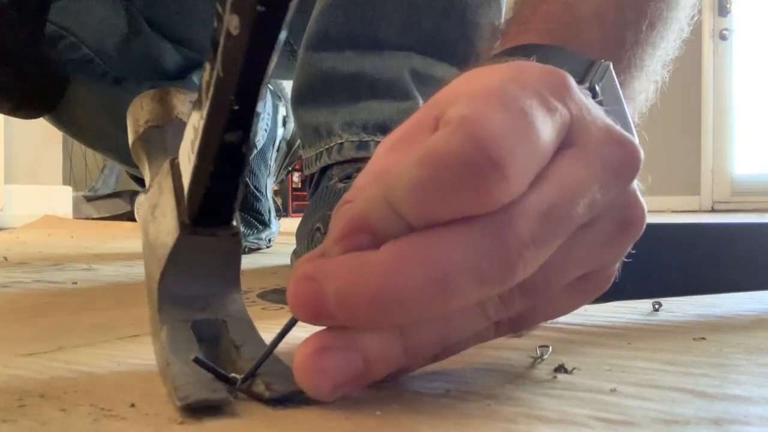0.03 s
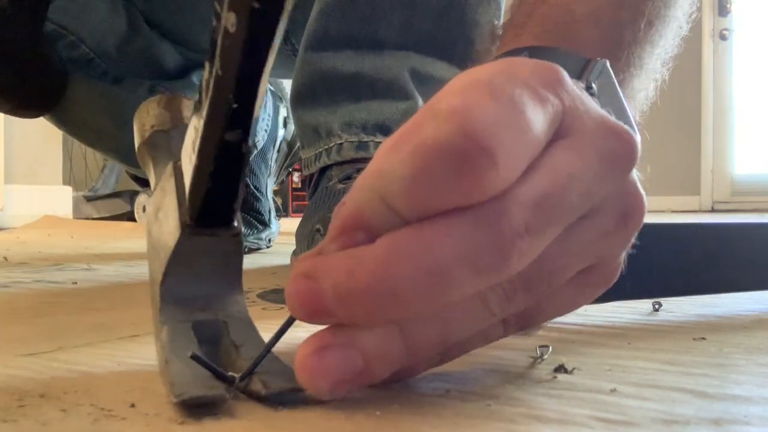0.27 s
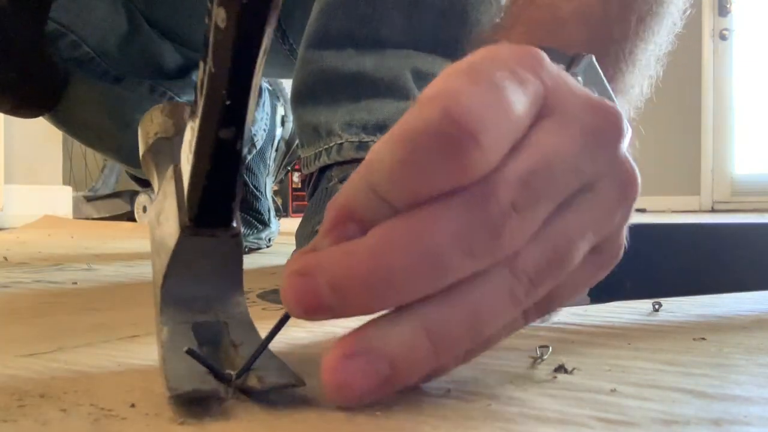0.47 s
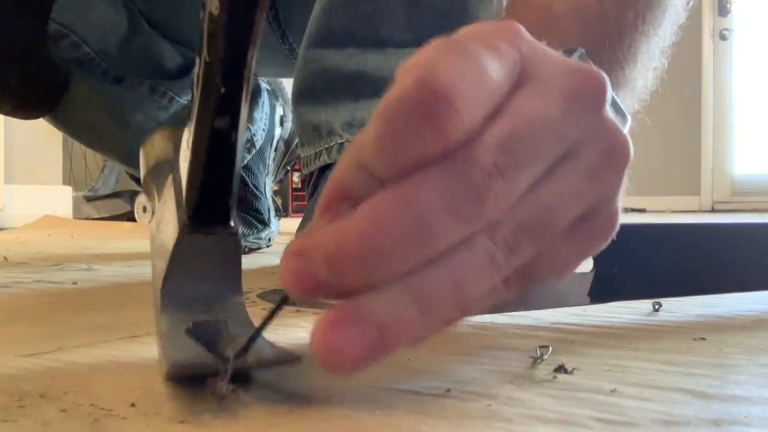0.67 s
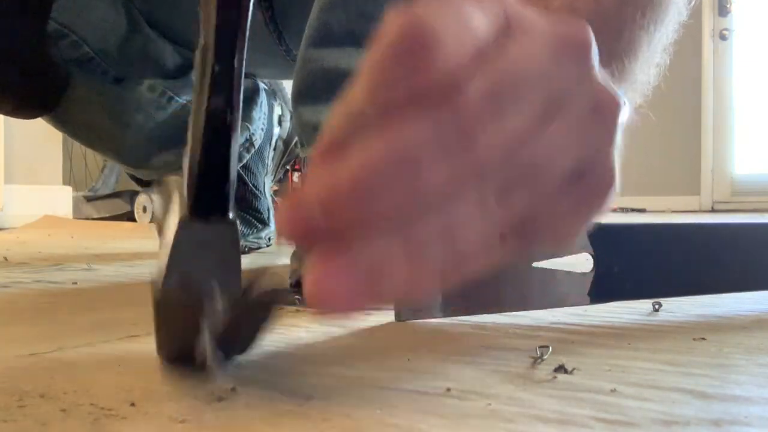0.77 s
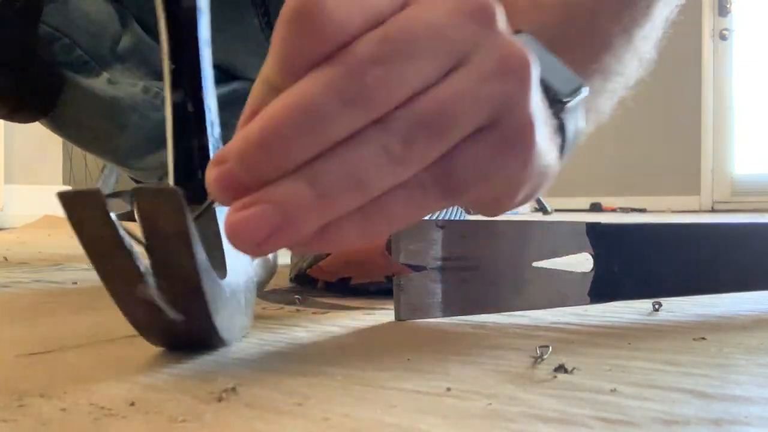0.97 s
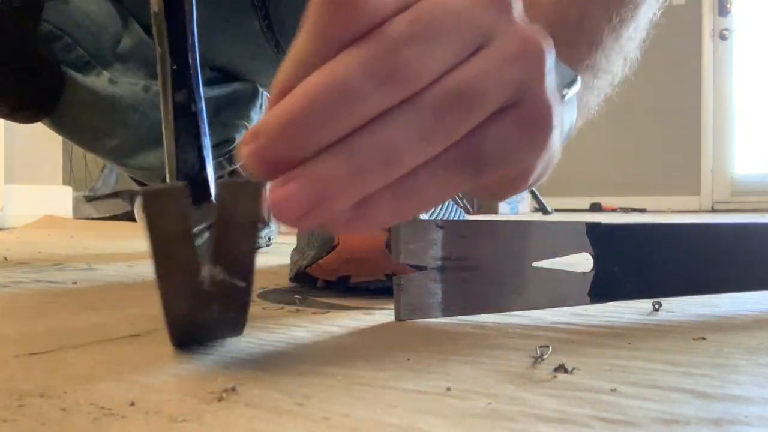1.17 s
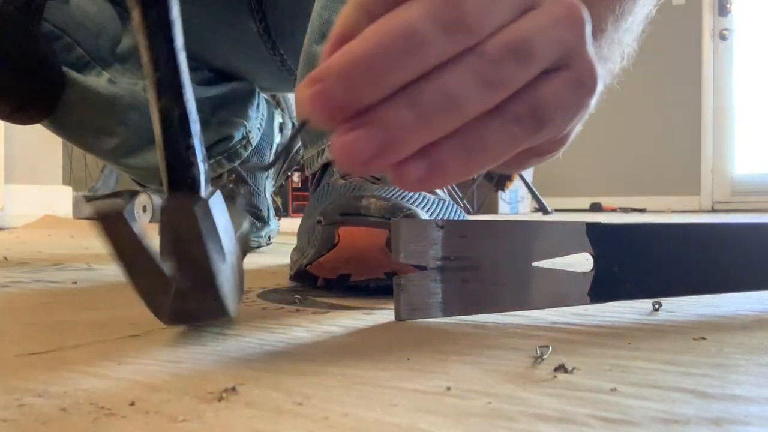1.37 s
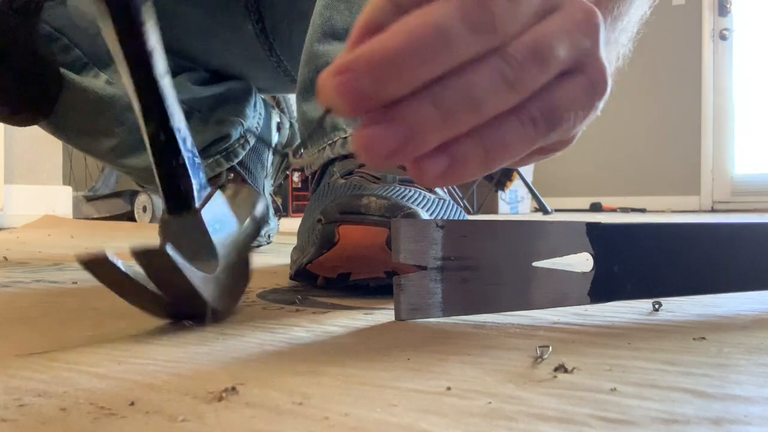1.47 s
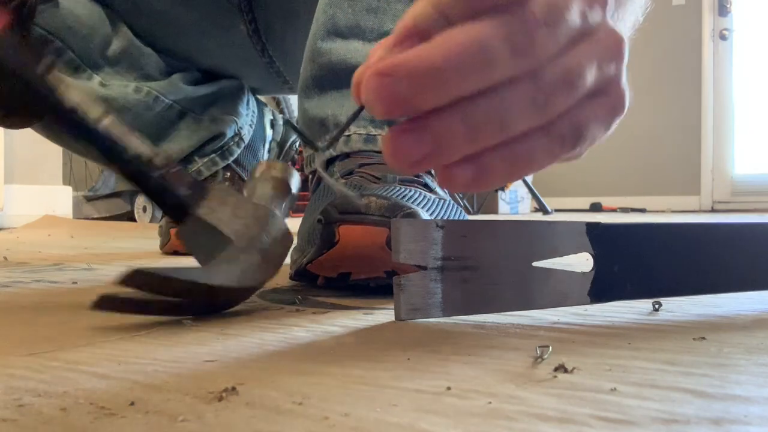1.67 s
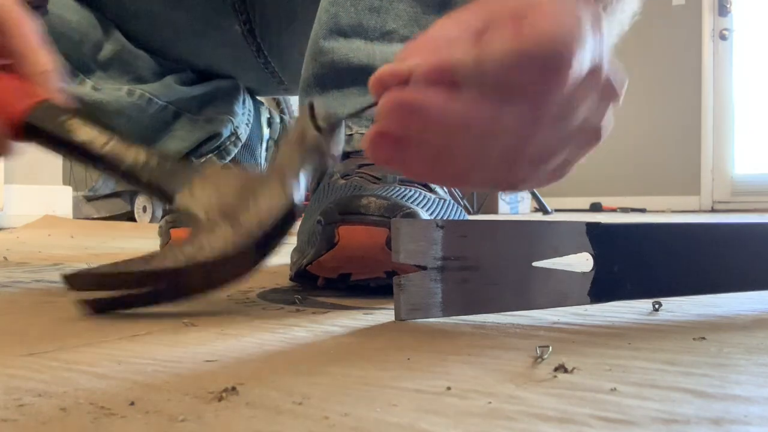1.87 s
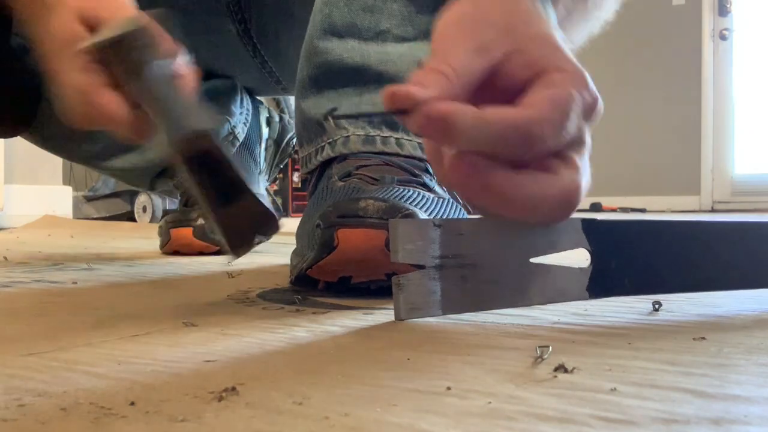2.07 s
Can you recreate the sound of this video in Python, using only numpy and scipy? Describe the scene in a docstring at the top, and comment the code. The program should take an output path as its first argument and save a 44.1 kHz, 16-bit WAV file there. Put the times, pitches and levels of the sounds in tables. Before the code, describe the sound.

Close stereo sound of a steel hammer head prying and rocking on floorboards: faint ticks, a short wood creak and click cluster, a hard double clack, then hissing drags and dull knocks, with little echo.

```python
"""On a plywood subfloor: a claw hammer levers out a staple, close to a camera lying on the same boards.
Behind it lie steady room tone and a diffuse room answer. The steel head drags, rocks and knocks: friction
noise and smooth pushes sound through the resonances of the boards, and grit hisses as dense uneven slips.
Wood creaks and a thin claw squeal are gliding rough tones; claw and staple tick as short noise bursts,
and the steel rings faintly as friction in narrow resonances. Two microphone ports hear it in stereo."""
import sys
import numpy as np
from scipy import signal
from scipy.fft import rfft, irfft, next_fast_len
from scipy.io import wavfile
from scipy.ndimage import map_coordinates

SR = 44100
rng = np.random.default_rng(int(sys.argv[2]) if len(sys.argv) > 2 else 0)


def pcm_store(signal):
    """Save signal as 16-bit PCM."""
    levels = np.round(np.clip(np.atleast_2d(signal), -1, 1) * 32767)
    wavfile.write(sys.argv[1], SR, levels.astype(np.int16).T)


N = 94021  # samples, about 2.13 s
TIME = np.arange(N) / SR  # s


def amp(db):
    """Decibels to a linear factor."""
    return 10 ** (np.asarray(db) / 20)


def unit(x):
    """Scale a signal to an RMS of one."""
    return x / np.sqrt(np.mean(x ** 2) + 1e-20)


def white():
    """Even noise over the whole scene."""
    return rng.standard_normal(N)


def along(points, hz):
    """Interpolate (frequency, value) points on a log frequency axis."""
    f, value = np.transpose(points)
    return np.interp(np.log(hz + 1), np.log(f + 1), value)


def level(points):
    """Interpolate (time, level) points over the scene, in dB."""
    return np.interp(TIME, *np.transpose(points))


def wobble(rate):
    """A smooth random curve through rate knots a second."""
    knots = rng.standard_normal(int(N * rate / SR) + 4)
    return map_coordinates(knots, [np.arange(N) * rate / SR])


def filtered(x, response):
    """Multiply the spectrum of x by a complex response of frequency."""
    m = next_fast_len(N + SR // 2)
    return irfft(rfft(x, m) * response(np.fft.rfftfreq(m, 1 / SR)), m)[..., :N]


def high_pass(f, corner):
    """First-order low cut."""
    return 1j * f / (corner + 1j * f)


def low_pass(f, corner):
    """First-order high cut."""
    return 1 / (1 + 1j * f / corner)


def resonances(modes, f, flip=True):
    """A body's answer to a force; close to the blow all modes start in step, further off they alternate."""
    total = 0
    for k, (centre, width, db) in enumerate(modes):
        sign = (-1) ** (k * flip)
        total = total + sign * amp(db) * 1j * f * width / (centre ** 2 - f ** 2 + 1j * f * width)
    return total


# Spectrum of the room tone: (frequency [Hz], relative density [dB])
AIR_SPECTRUM = [(25, -4.5), (76, -38), (200, -24), (1000, -24.5), (3000, -39), (8000, -42), (15500, -64),
                (16100, -85)]


def room_tone():
    """Steady shaped noise, the air behind the work."""
    air = filtered(white(), lambda f: amp(along(AIR_SPECTRUM, f)))
    return amp(-74.5) * unit(air)


# How fast the room falls silent: (frequency [Hz], time to fall 60 dB [s])
ROOM_DECAY = [(200, 0.047), (2000, 0.28), (10000, 0.048)]
ROOM_DB, ROOM_LOW_HZ, ROOM_TOP_HZ = -13, 150, 4000
ROOM_DELAY = 300  # samples before the room's answer


def room(x):
    """Two independent noise tails answer the sound; each frequency dies at its own speed."""
    hz, t, grains = signal.stft(rng.standard_normal((2, SR // 2)), SR, nperseg=256)
    decay = amp(-60 * t / along(ROOM_DECAY, hz)[:, None])
    tail = signal.istft(grains * decay, SR, nperseg=256)[1]
    tail = tail / np.linalg.norm(tail[0])
    delayed = np.pad(x, (ROOM_DELAY, 0))[None]
    answer = signal.fftconvolve(delayed, tail, axes=1)[:, :N]
    walls = lambda f: high_pass(f, ROOM_LOW_HZ) * low_pass(f, ROOM_TOP_HZ)
    return amp(ROOM_DB) * filtered(answer, walls)


# Rubs that set the steel ringing roughly: (time [s], level [dB], time to fall 60 dB [s])
RUBS = [(0.921, -52, 0.16), (0.956, -58, 0.25), (1.055, -70, 0.1), (1.383, -64, 0.08), (2.122, -66, .1)]
# Resonances of the steel, applied twice: (frequency [Hz], width per pass [Hz], level per pass [dB])
STEEL_MODES = [(3520, 26, -10), (4320, 520, 19), (6200, 100, -5)]


def rings():
    """Dying bursts of friction in the steel's resonances."""
    swell = 0
    for start, db, t60 in RUBS:
        fall = 60 * np.maximum(TIME - start, 0) / t60
        swell = swell + (TIME >= start) * amp(db - fall)
    steel = filtered(white(), lambda f: resonances(STEEL_MODES, f) ** 2)
    return swell * unit(steel)


# Short creaks of the strained wood and a thin squeal of the claw:
# (time [s], length [s], first pitch [Hz], last pitch [Hz], level at the crest [dB], roughness [0-1])
CREAK_EVENTS = [(-.02, 0.065, 540, 470, -48, .4), (.645, 0.035, 975, 970, -42, .4),
                (.715, 0.075, 965, 950, -38, .4), (.695, 0.08, 530, 430, -41, .5),
                (.54, .26, 5850, 5800, -64, 1)]
CREAK_RATE = .14  # random knots a second over the first pitch in Hz, for a fully rough tone


def creaks():
    """Each creak is a rough tone that swells, sags in pitch and fades."""
    out = 0
    for start, length, first_hz, last_hz, db, rough in CREAK_EVENTS:
        progress = np.clip((TIME - start) / length, 0, 1)
        pitch = first_hz + (last_hz - first_hz) * progress
        phase = 2 * np.pi * np.cumsum(pitch) / SR
        rate = CREAK_RATE * rough * first_hz
        in_phase = (1 - rough + rough * wobble(rate)) * np.cos(phase)
        tone = in_phase + rough * wobble(rate) * np.sin(phase)
        out = out + amp(db) * np.sin(np.pi * progress) ** 2 * unit(tone)
    return out


# Ticks of steel on steel:
# (time [s], level [dB], centre [Hz], spread of the bell curve [octaves], time to fall 60 dB [s])
TICK_EVENTS = [(0.064, -40, 10700, 0.92, 0.015), (0.2908, -46.5, 6170, 0.36, 0.0074),
               (0.3147, -34, 6600, 0.43, 0.0042), (0.52, -46.5, 10300, 0.67, 0.047),
               (0.602, -39, 5700, 0.96, 0.0095), (0.6154, -36.5, 10000, 1.5, 0.0056),
               (0.6986, -27, 11500, 0.72, 0.0054), (0.748, -30, 10400, 0.41, 0.0069),
               (0.7536, -23, 10800, 0.92, 0.0059), (0.767, -27.5, 8600, 0.63, 0.0064),
               (0.8411, -27, 13200, 0.86, 0.0072), (0.846, -27.5, 11700, 0.26, 0.0069),
               (0.9433, -41, 9000, .7, 0.0064), (0.9948, -37.5, 9900, 1, 0.0098),
               (1.2401, -37, 8900, 0.76, 0.0078), (1.261, -26.5, 11500, 0.52, 0.0073),
               (1.2699, -38, 8400, 1.4, 0.0089), (1.3048, -22, 2330, 0.38, 0.0069),
               (1.3046, -14, 10700, 0.87, 0.0065), (1.3812, -35.5, 8420, 0.77, 0.0069),
               (1.431, -23, 3520, 0.97, 0.013), (1.4326, -32.5, 4170, 0.61, 0.029),
               (1.783, -41.5, 6500, 0.68, 0.0093), (1.867, -26, 11200, 0.66, 0.0051)]
TICK_TAIL_DB, TICK_TAIL_S, TICK_RISE_S = -28, .03, .0004  # sizzle level and t60, attack time constant


def ticks():
    """A brief crack of noise around its centre, with a faint sizzle after it."""
    length = 4096
    out, t = np.zeros(N + SR), np.arange(length) / SR
    f = np.fft.rfftfreq(length, 1 / SR) + 1  # keeps the logarithm finite
    rise = 1 - np.exp(-t / TICK_RISE_S)
    sizzle = amp(TICK_TAIL_DB - 60 * t / TICK_TAIL_S)
    for start, db, hz, octaves, t60 in TICK_EVENTS:
        bell = np.exp(-.5 * (np.log2(f / hz) / octaves) ** 2)
        noise = unit(irfft(rfft(rng.standard_normal(length)) * bell))
        shape = (amp(-60 * t / t60) + sizzle) * rise
        out[round(start * SR):][:length] += amp(db) * noise * shape
    return out[:N]


def slips(rate, spread_db, smooth):
    """Random stick-slip impulses of uneven size on a share of smooth friction noise."""
    hit = rng.random(N) < rate / SR  # rate is slips a second
    sizes = white() * amp(spread_db * rng.exponential(size=N))
    return unit(hit * sizes) + smooth * white()


# Gritty hiss under the head: (time [s], level [dB])
HISS_LEVEL = [(0, -67.5), (.1, -69), (.25, -64.5), (.29, -72.5), (.33, -55), (.39, -56), (.42, -70),
              (.5, -65.5), (.56, -69), (.62, -59.5), (.72, -67.5), (.75, -48), (.81, -50), (.86, -62),
              (.92, -57.5), (1.0, -62), (1.04, -80), (1.23, -81.5), (1.25, -59), (1.30, -50), (1.32, -62),
              (1.38, -64.5), (1.42, -70), (1.44, -71), (1.487, -63.5), (1.497, -40), (1.52, -38.5),
              (1.55, -46.5), (1.63, -52), (1.72, -73.5), (1.775, -67), (1.79, -51.5), (1.84, -40.5),
              (1.86, -51), (1.87, -36.5), (1.885, -46), (1.93, -39.5), (1.94, -56.5), (1.952, -50),
              (1.965, -58.5), (2.03, -76), (2.11, -79.5), (2.13, -72)]
# Spectrum of the grit: (frequency [Hz], relative density [dB])
GRIT_SPECTRUM = [(600, -14), (1500, -10.5), (3000, -9.5), (5500, -3.5), (8000, -2.5), (11000, -0.5),
                 (15600, -6.5), (16100, -16)]


def hiss():
    """Dense slips of grit heard directly, their level trembling by a few dB."""
    grit = filtered(slips(rate=4000, spread_db=1.75, smooth=.85), lambda f: amp(along(GRIT_SPECTRUM, f)))
    return amp(level(HISS_LEVEL) + 2.1 * wobble(34.97)) * unit(grit)


# Resonances of the subfloor: (frequency [Hz], width [Hz], level [dB])
BOARD_MODES = [(31.7, 10.7, -1.5), (59.1, 16.35, 7), (114.4, 17.1, 3.5), (156.2, 19.9, 6), (248.3, 18, -6),
               (317.4, 29.6, -3.5), (415.4, 17.2, -2.5), (480.6, 130, -11.5), (610, 24, -16),
               (835, 43.4, -17.5), (984.5, 60, -14.5), (1163, 270, -29), (1500, 39, -16.5),
               (1612, 34, -18.5), (2192, 30, -27.5)]


def boards(f):
    """The subfloor's answer to friction."""
    return resonances(BOARD_MODES, f)


# Woody grind of the dragging head: (time [s], level [dB])
GRIND_LEVEL = [(0, -54.5), (.04, -55), (.12, -65), (.35, -65.5), (.52, -83), (.59, -65.5), (.63, -47),
               (.66, -35.5), (.69, -37.5), (.72, -40.5), (.76, -34.5), (.80, -41.5), (.9, -52.5),
               (1.0, -55), (1.1, -75.5), (1.22, -91.5), (1.29, -47.5), (1.34, -53), (1.42, -51.5),
               (1.46, -49.5), (1.6, -49), (1.68, -59), (1.77, -81.5), (1.84, -47.5), (1.92, -40.5),
               (1.96, -57.5), (2.04, -68), (2.13, -62)]
GRIND_LOW_HZ, GRIND_TOP_HZ = 196, 1160


def grind():
    """Stick-slip friction shakes the upper resonances of the boards."""
    friction = slips(rate=900, spread_db=3, smooth=.8)
    band = lambda f: high_pass(f, GRIND_LOW_HZ) ** 4 * low_pass(f, GRIND_TOP_HZ)
    wood = filtered(friction, lambda f: boards(f) * band(f))
    return amp(level(GRIND_LEVEL) + .21 * wobble(41.6)) * unit(wood)


# Boom in the boards as the head drags and rocks: (time [s], level [dB])
BOOM_LEVEL = [(0, -47), (.05, -52.5), (.3, -61.5), (.55, -70), (.64, -67), (.68, -90), (.74, -44),
              (.79, -35), (.88, -45), (.93, -56), (1.0, -42.5), (1.17, -56), (1.28, -61.5), (1.34, -29.5),
              (1.42, -35), (1.48, -32.5), (1.52, -52), (1.64, -37.5), (1.7, -49.5), (1.81, -48.5),
              (1.86, -38), (1.93, -31.5), (2.0, -40), (2.13, -40.5)]
BOOM_TOP_HZ = 161


def boom():
    """Smooth friction shakes the low resonances of the boards."""
    floor = filtered(white(), lambda f: boards(f) * low_pass(f, BOOM_TOP_HZ) ** 2)
    return amp(level(BOOM_LEVEL)) * unit(floor)


# Knocks of the head on the boards:
# (time [s], peak level [dB], contact time [ms], lowest resonance reached [Hz])
KNOCK_EVENTS = [(.002, -36, 11.3, 65), (.144, -39.5, 6.9, 104), (0.65, -39, 1.1, 270),
                (0.663, -37, 7.1, 15), (.700, -31.5, 3.7, 250), (0.761, -29.5, 0.4, 410),
                (.835, -31.5, 7.7, 35), (0.886, -37, 5.2, 38), (0.952, -24.5, 7.8, 60),
                (1.301, -24, 0.66, 270), (1.305, -21, 0.24, 630), (1.308, -13.5, 2.9, 64),
                (1.368, -33.5, 3.4, 120), (1.431, -22, 0.25, 1040), (1.436, -21, 0.29, 524),
                (1.438, -22, 7, 27), (1.440, -35.5, 0.3, 810), (1.512, -22, 7.8, 54),
                (1.549, -23, 10.6, 53), (1.571, -24, 6.6, 54), (1.625, -35, 21, 30), (1.878, -30, 3.6, 93),
                (1.895, -27, 3.6, 126), (1.916, -49.5, 2.8, 320), (1.933, -20, 3.1, 27),
                (2.051, -23.5, 8.5, 300), (2.063, -27.5, 3.9, 73), (2.118, -24, 5, 240),
                (2.123, -22, 5, 263)]


def knocks():
    """Each knock is a smooth push; a short contact reaches the higher resonances."""
    out, t = np.zeros(N + SR), np.arange(SR // 2) / SR
    f = np.fft.rfftfreq(len(t), 1 / SR)
    for start, db, contact_ms, low_hz in KNOCK_EVENTS:
        push = t ** 2 * np.exp(-t / (contact_ms / 6000))  # crests a third of the way into the contact
        reached = [(hz, width, gain - 10 * np.log10(1 + (low_hz / hz) ** 12))
                   for hz, width, gain in BOARD_MODES]
        knock = irfft(rfft(push) * resonances(reached, f, flip=False))
        out[round(start * SR):][:len(t)] += amp(db) * knock / np.abs(knock).max()
    return out[:N]


# Phase by which the left port leads the right: (frequency [Hz], lead [rad])
PORT_LEAD = [(0, 0), (1550, 1.0), (2330, -1.6), (3880, 0), (4910, -2.3), (5650, 0)]
LEAD_TURN_HZ = 2540  # above the last point the lead grows one turn per this many Hz
# Balance of the ports: (frequency [Hz], left over right [dB])
PORT_BALANCE = [(300, 0), (1300, -2), (4400, -2), (9000, 0)]


def ports(x):
    """Two microphone ports hear the same sound with a phase lead and balance that depend on frequency."""
    hz, rad = np.transpose(PORT_LEAD)

    def left(f):
        lead = np.interp(f, hz, rad) + 2 * np.pi * np.maximum(f - hz[-1], 0) / LEAD_TURN_HZ
        return np.exp(.5j * lead) * amp(along(PORT_BALANCE, f) / 2)  # half the difference

    return filtered(x, lambda f: left(f) ** np.array([[1], [-1]]))  # the right port is the inverse


def scene():
    """The work on the floor, heard directly at the ports and through the room."""
    work = room_tone() + rings() + creaks() + ticks() + hiss() + grind() + boom() + knocks()
    return ports(work) + room(work)


ROLL_OFF_HZ, TOP_HZ = 15400, 16600


def record(dry):
    """The microphone dulls at the very top; the camera keeps nothing above its band limit."""
    return filtered(dry, lambda f: (f < TOP_HZ) / np.sqrt(1 + (f / ROLL_OFF_HZ) ** 40))


dry = scene()
out = record(dry)
pcm_store(out)
```